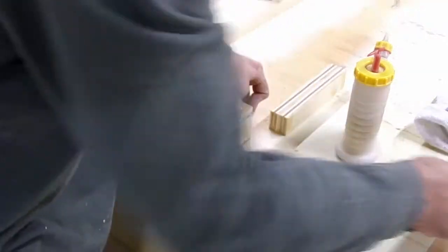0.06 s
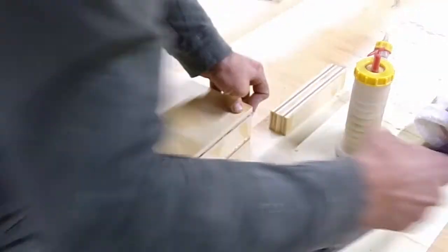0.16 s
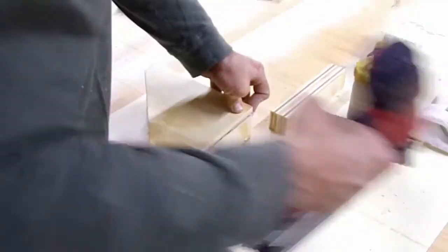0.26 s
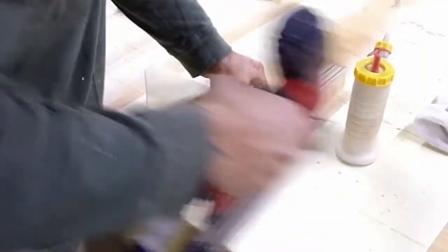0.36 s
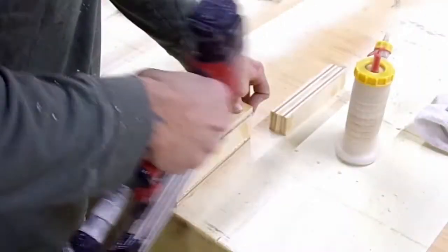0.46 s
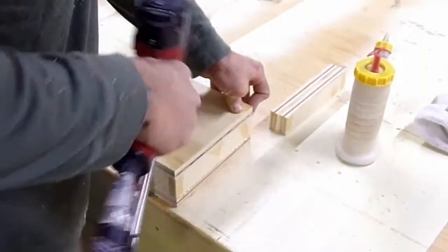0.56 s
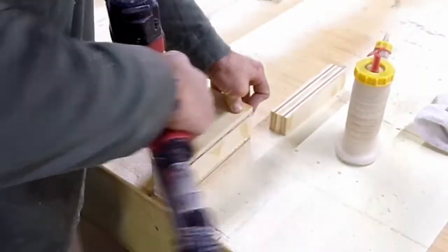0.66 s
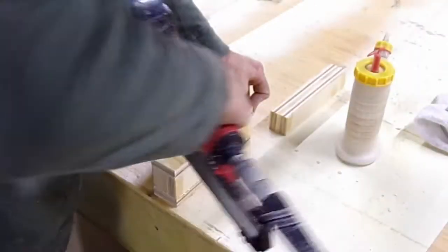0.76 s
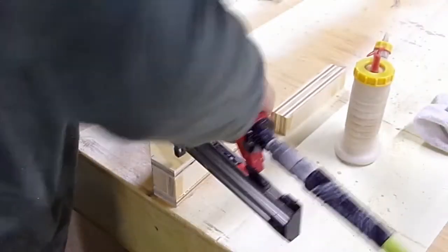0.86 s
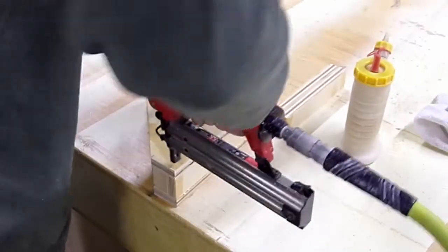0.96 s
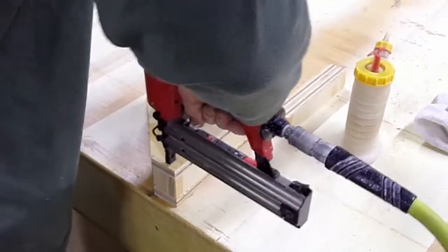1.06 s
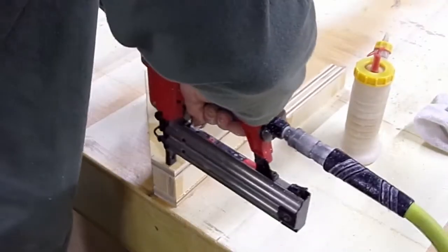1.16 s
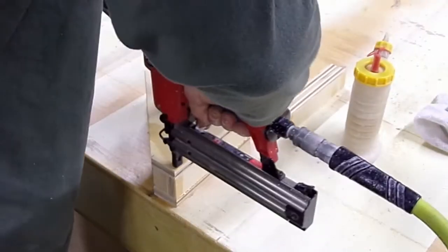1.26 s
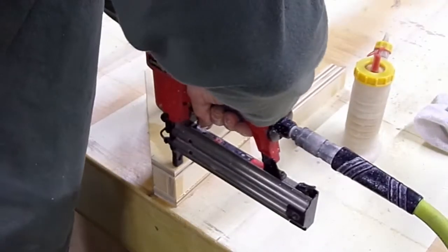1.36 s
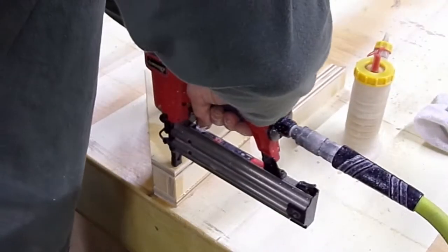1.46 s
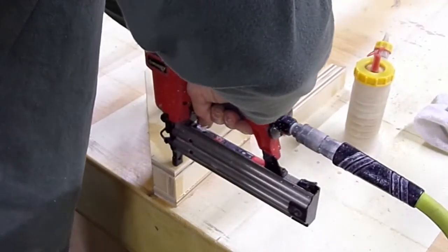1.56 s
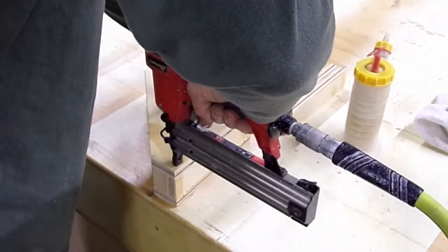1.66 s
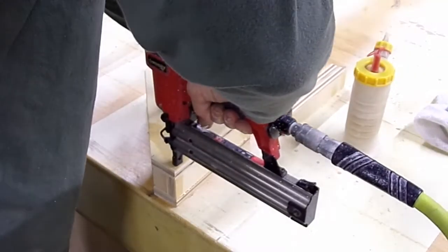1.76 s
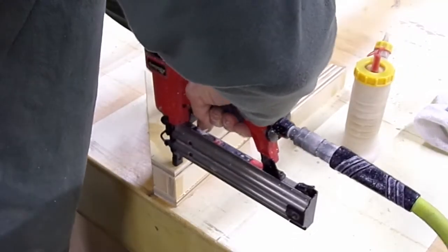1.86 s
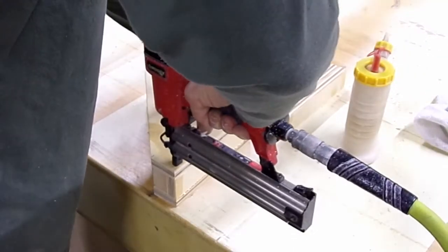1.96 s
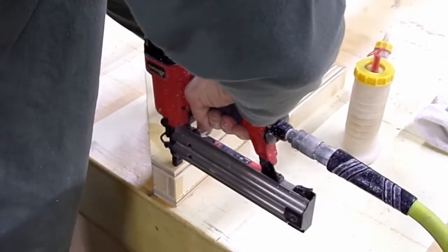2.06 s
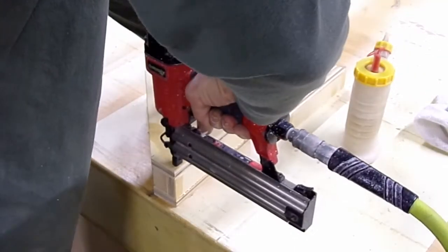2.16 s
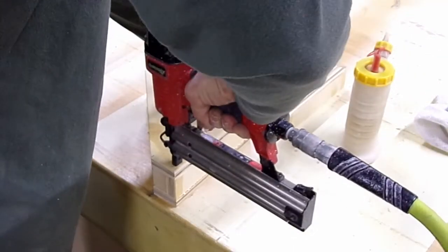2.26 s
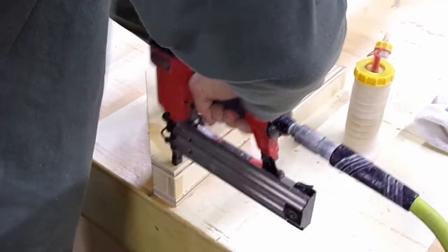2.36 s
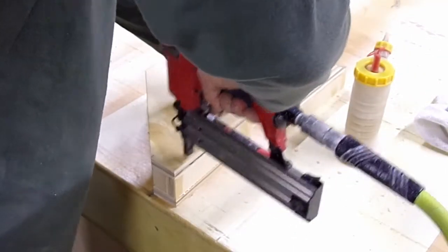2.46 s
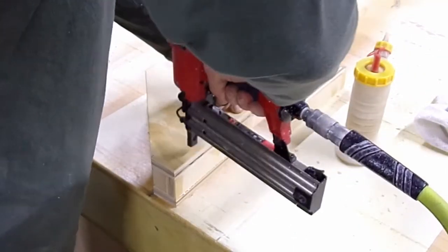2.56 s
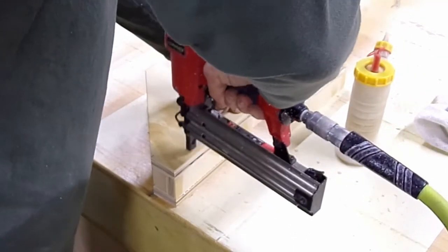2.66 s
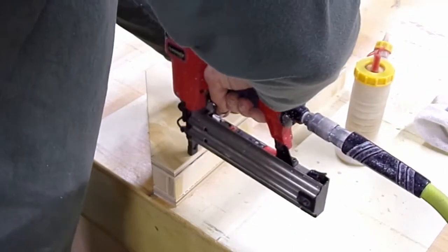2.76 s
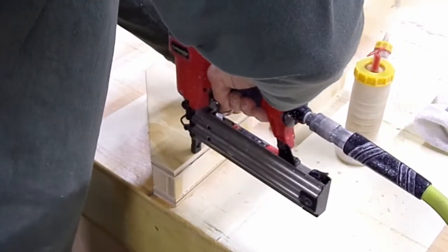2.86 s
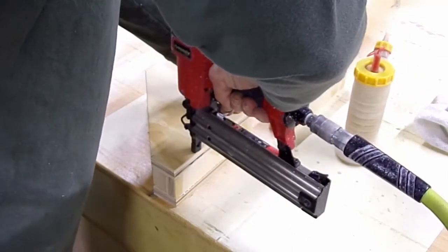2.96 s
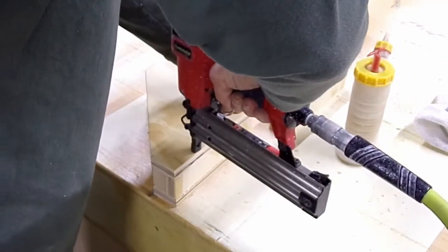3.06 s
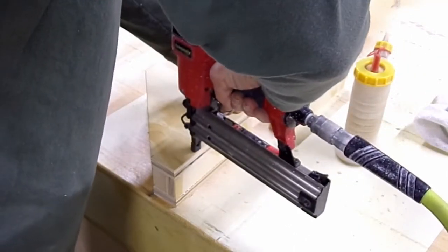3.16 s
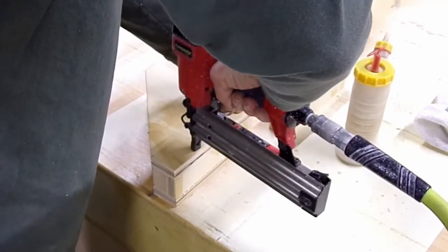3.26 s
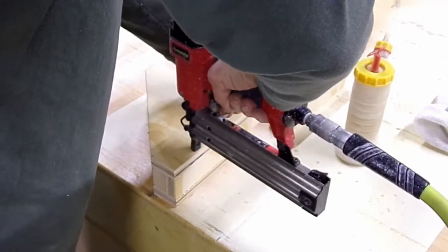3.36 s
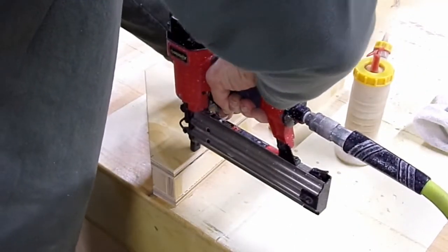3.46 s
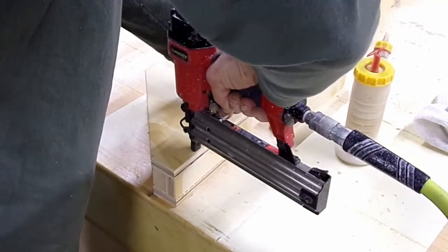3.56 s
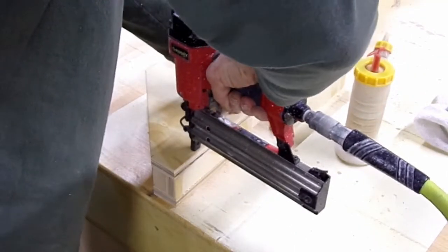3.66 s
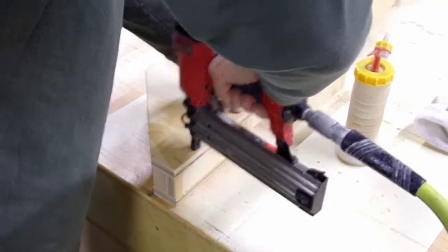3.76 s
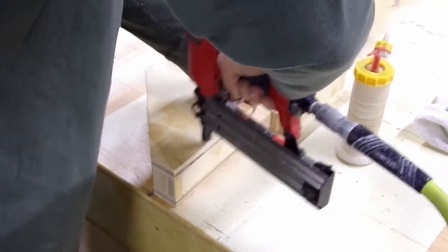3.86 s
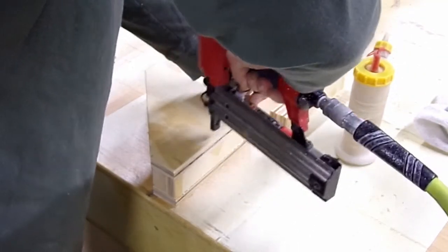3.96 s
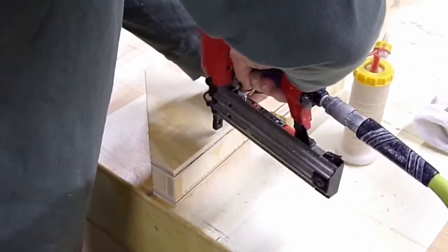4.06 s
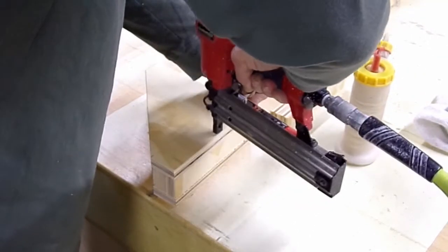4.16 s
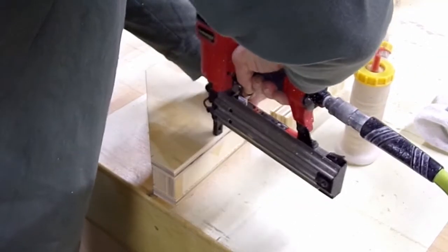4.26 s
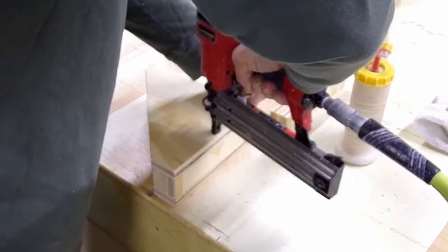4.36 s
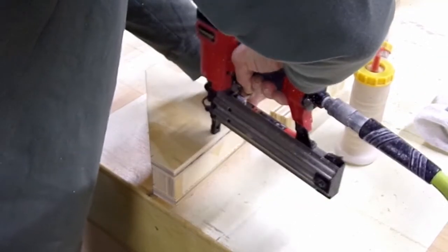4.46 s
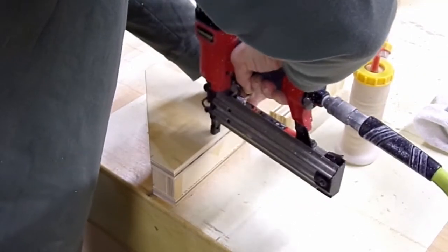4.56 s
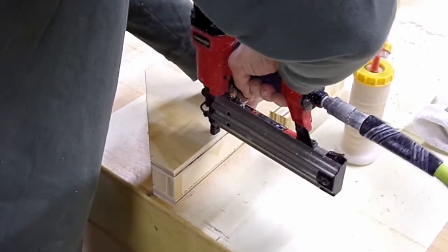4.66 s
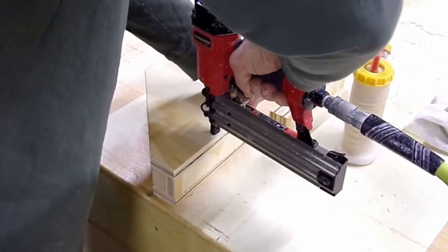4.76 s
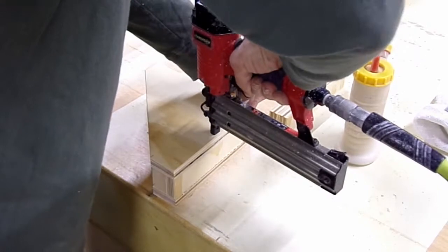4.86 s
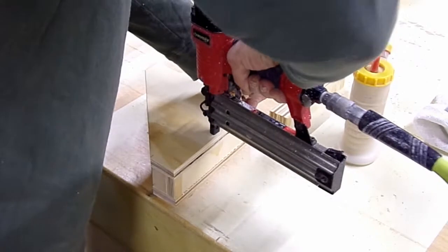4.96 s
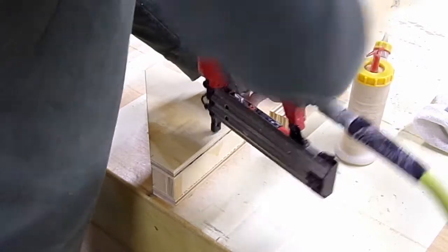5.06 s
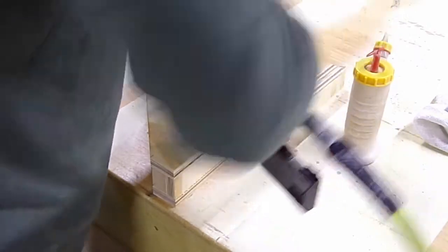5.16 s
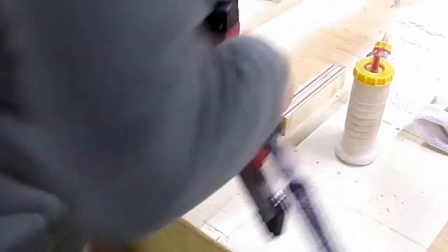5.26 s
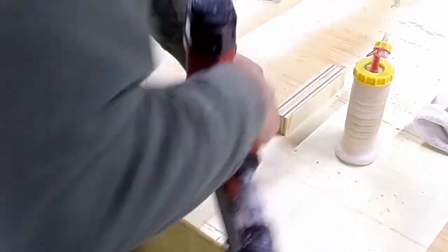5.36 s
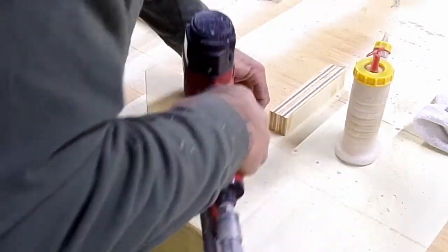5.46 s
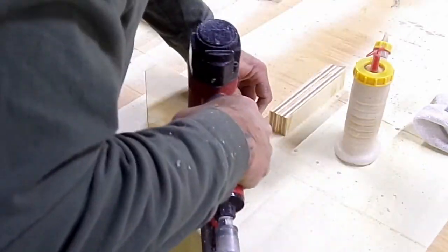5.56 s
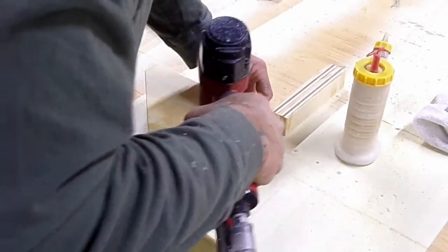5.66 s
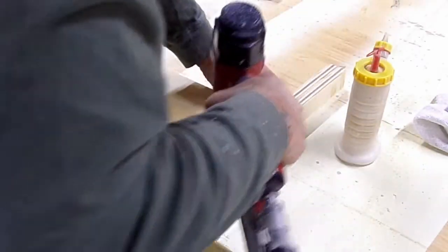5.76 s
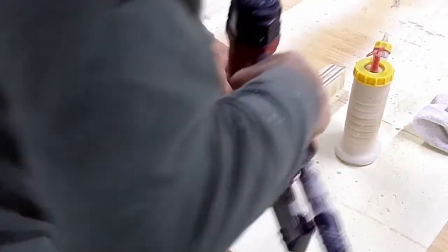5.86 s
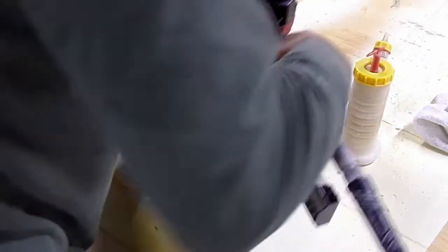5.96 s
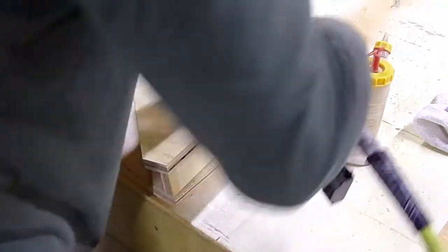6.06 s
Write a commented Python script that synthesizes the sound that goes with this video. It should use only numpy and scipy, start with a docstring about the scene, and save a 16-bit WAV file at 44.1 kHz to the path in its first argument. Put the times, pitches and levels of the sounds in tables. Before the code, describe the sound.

A low motor hum and dull fan rush run throughout in a workshop with a short, bright reverberation. At 0 s a tool scrapes softly off the bench; a faint rub of loose steel follows at 1.0, a touch on wood at 1.4 and a tick at 1.9. At 2.2 a pneumatic nailer fires: trigger click, spit of air, violent metallic crack with bench boom, then about 0.12 s later a sharp exhaust puff and a quick falling chirp. A thin refill hiss fades. At 2.7 the nose clicks and thuds on the wood, with small nudges at 3.2 and 3.4. The second shot comes at 3.6, a tick at 4.4, a firmer press at 4.6, the third shot at 4.9. A firm, clattering plywood knock lands at 5.8, a much lighter one at 6.0. The microphone is close, clipping on the shots and dipping the background afterwards.

```python
"""A pneumatic brad nailer fires three times into plywood, close to a small overloading microphone.
Over a workshop machine's hum and fan noise, the tool slides off the bench, ticks in the hand and is pressed on the wood.
Each shot is a trigger click, a spit of air, the driver's blow, an exhaust puff and the piston's falling chirp.
A faint hiss follows as air refills the tool; at the end the nose knocks down on the plywood, firmly, then lightly.
Noise bursts make air and friction, decaying modes make wood and steel, and decaying noise makes the room."""
import sys
import numpy as np
from scipy import signal
from scipy.fft import irfft
from scipy.io import wavfile
from scipy.ndimage import uniform_filter1d

SR = 44100
rng = np.random.default_rng(int(sys.argv[2]) if len(sys.argv) > 2 else 0)


def store_pcm(level_fs):
    """Save levels as 16-bit WAV."""
    pcm = np.round(np.clip(level_fs, -1, 1) * 32767).astype(np.int16)
    wavfile.write(sys.argv[1], SR, np.atleast_2d(pcm).T)


N = 269892
T = np.arange(SR // 2) / SR  # time axis of one short sound, in seconds


def amp(db):
    """Decibels to gain."""
    return 10 ** (np.asarray(db) / 20)


def read(points, hz):
    """A table's value on a log-frequency axis."""
    f, value = np.transpose(points)
    return np.interp(np.log(hz + 1), np.log(f), value)


def add(mix, s, sound):
    """Mixes a sound in at time s."""
    part = mix[max(round(s * SR), 0):][:len(sound)]
    part += sound[:len(part)]


def colour(x, points, tilt_db=0, size=4096):
    """Causal filter of unit energy with the given spectrum, tilted in dB per octave above 500 Hz."""
    hz = abs(np.fft.fftfreq(size, 1 / SR))
    octaves_up = np.log2(np.maximum(hz, 500) / 500)
    log_gain = np.log(amp(read(points, hz) + tilt_db * octaves_up))
    # the minimum-phase response starts without pre-echo
    taps = np.fft.ifft(np.exp(np.conj(signal.hilbert(log_gain)))).real
    return signal.fftconvolve(x, taps / np.linalg.norm(taps))[:len(x)]


def burst(rise, hold, t60):
    """Noise that swells for rise s, dies away from hold s on, and falls 60 dB every t60 s."""
    envelope = np.minimum(T / rise, 1) * amp(-60 * np.maximum(T - hold, 0) / t60)
    return envelope * rng.standard_normal(len(T))


def ring(modes, spread_db):
    """Struck modes: decaying sines, each a little different in strength and pitch from blow to blow."""
    out = np.zeros(len(T))
    for hz, db, t60 in modes:
        strength, detune = rng.standard_normal(2)
        cycles = hz * (1 + .005 * detune) * T + rng.random()
        envelope = amp(db + spread_db * strength - 60 * T / t60)
        out += envelope * np.sin(2 * np.pi * cycles)
    return out


# Decay of the workshop's reverberation. Each row: frequency in Hz, time to fall 60 dB in seconds.
ROOM_DECAY = [(120, 0.2135), (600, 0.1866), (1700, 0.2814), (4500, 0.3318), (9000, 0.29), (15000, 0.22)]
# Tone of the reverberation. Each row: frequency in Hz, relative level in dB.
ROOM_TONE = [(100, 6), (600, 4), (1500, 4.5), (4000, 5), (8000, 1), (14000, -5.5)]


def workshop(x, wet_db, build):
    """Dense reflections that build up over about build s, then die band by band."""
    hz, t, bands = signal.stft(rng.standard_normal(SR), SR, nperseg=256)
    bands = bands * amp(-60 * t / read(ROOM_DECAY, hz)[:, None])
    tail = signal.istft(bands, SR, nperseg=256)[1][:len(T)]
    tail = colour(tail * (1 - np.exp(-(T / build) ** 2)), ROOM_TONE)
    wet = signal.fftconvolve(x, tail / np.linalg.norm(tail))[:len(x)]
    return x + amp(wet_db) * wet


# Rush of the machine's fan. Each row: frequency in Hz, relative level in dB per Hz.
FAN_SPECTRUM = [(25, -32.5), (60, -14), (100, -5), (160, -1.5), (290, 1.5), (460, -10.5), (600, -2),
                (1200, -12), (2800, -12), (4500, -20), (7000, -31.5), (9000, -37), (11000, -46),
                (15500, -41.5)]
# Steady tones of the machine. Each row: frequency in Hz, level in dB rms.
MOTOR_TONES = [(120, -46.5), (280, -60.5), (360, -60), (420.5, -60.5), (705, -74), (857.5, -59),
               (1125, -68)]


def machine():
    """A running motor: slightly wavering tones over the rush of its fan."""
    t = np.arange(N) / SR
    out = amp(-47.5) * colour(rng.standard_normal(N), FAN_SPECTRUM)
    knots = np.linspace(0, t[-1], num=30)
    for hz, db in MOTOR_TONES:
        wander = np.interp(t, knots, rng.standard_normal(len(knots)))
        out += amp(db) * np.sqrt(2) * np.sin(2 * np.pi * hz * (t + .00008 * wander))
    return out


# Singing resonances of the hose coupling. Each row: frequency in Hz, width in Hz, level in dB rms before fading.
COUPLING_RESONANCES = [(4930, 250, -62), (9640, 110, -70), (12980, 260, -74)]
REFILL_T60_S = 2.6


def refill():
    """Air streams back after each shot: a faint hiss in narrow resonances, fading as the pressure evens out."""
    t, flow, out = np.arange(N) / SR, np.zeros(N), np.zeros(N)
    for s, _, _, vent_after in SHOT_TIMES:
        add(flow, s + vent_after, amp(-60 * t / REFILL_T60_S))
    for hz, width, db in COUPLING_RESONANCES:
        hiss = signal.lfilter(*signal.iirpeak(hz, hz / width, SR), rng.standard_normal(N))
        out += amp(db) * hiss / hiss.std()
    return flow * out


# Spectrum of small steel contacts. Each row: frequency in Hz, relative level in dB per Hz.
CLICK_SPECTRUM = [(200, -16.5), (1000, -7.5), (2400, 11), (4000, 2.5), (6200, -6.5), (8600, -8),
                  (10500, -25.5), (15000, -27.5)]
# Small spring in the nose. Each row: frequency in Hz, relative level in dB, time to fall 60 dB in seconds.
SPRING_MODES = [(1476, -1.5, 0.08), (2090, 1, 0.032), (3100, -2.5, 0.045), (8400, -10, .15)]


def click(tilt_db, length, spring_db, t60=.018):
    """Small steel parts scrape and click in noise of uneven grain, and the spring in the nose rings."""
    roughness = uniform_filter1d(rng.standard_normal(len(T)), size=49) * np.sqrt(49)
    grains = amp(3 * roughness)
    rub = burst(rise=0.00077, hold=length, t60=t60)
    scrape = colour(grains * rub, CLICK_SPECTRUM, tilt_db=tilt_db)
    return scrape + amp(spring_db) * ring(SPRING_MODES, spread_db=3.0)


# Dull answer of the wood. Each row: frequency in Hz, relative level in dB per Hz.
THUD_SPECTRUM = [(30, -43), (60, -26), (85, -8.5), (120, 0.5), (200, 0.5), (300, -0.5), (480, -7),
                 (850, -7), (1300, -16), (3000, -23), (8000, -57.5), (15000, -85)]


def thud():
    """The wood under the tip answers a contact with a low, soft burst."""
    return colour(burst(rise=0.0041, hold=0.0078, t60=0.12), THUD_SPECTRUM)


# A light touch is bright (tilt in dB per octave); a firmer one digs in and dulls (tilt lost per dB above LIGHT_DB).
LIGHT_DB, LIGHT_TILT_DB, DULLING = -41, 3.3, .45


def press(db, seats_after, seat_db, wood_db, spring_db):
    """The safety tip touches the wood, drags on it while it slides in, then seats against its spring."""
    tilt_db = LIGHT_TILT_DB - DULLING * (db - LIGHT_DB)
    out = amp(db) * click(tilt_db, length=.004, spring_db=-17, t60=.022)
    drag = click(tilt_db=1, length=seats_after, spring_db=-20)
    out += amp(wood_db) * (thud() + amp(-12) * drag)
    seat = click(tilt_db=0.5, length=.004, spring_db=spring_db - seat_db, t60=.06)
    add(out, seats_after, amp(seat_db) * seat)
    add(out, seats_after, amp(wood_db - 7.5) * thud())
    return out


# The tool slides off the bench. Its one row: start in seconds, level in dB, hold of the scrape in seconds.
BENCH_SLIDE = (.002, -41, .016)
# Loose steel parts tick as the grip shifts. Each row: start in seconds, level in dB, hold of the scrape in seconds.
GRIP_TICKS = [(1.042, -52.5, 0.034), (1.872, -39.5, .0014), (4.430, -40, 0.00333)]
# The nose nudges the workpiece. Each row: start in seconds, level of the click in dB, level of the wood in dB.
NOSE_NUDGES = [(2.705, -48, -45), (3.229, -50, -42.5), (3.3736, -38, -39.5)]
# The safety tip is pressed on the wood, then seats. Each row: start in seconds, level of the touch in dB,
# seconds until it seats, level of the seating in dB, level of the wood in dB, level of the seated spring in dB.
TIP_PRESSES = [(1.4417, -41, .021, -42.5, -54, -42), (2.716, -41.5, 0.027, -40.5, -37, -56),
               (4.606, -30, .031, -44, -33, -62)]
TRIGGER_DB = -44


def handling():
    """The tool is picked up, shifted, pressed on the work and triggered: steel clicks and soft wood thuds."""
    out = np.zeros(N)
    s, db, length = BENCH_SLIDE
    slide = click(tilt_db=-2.5, length=length, spring_db=-24, t60=0.24)
    add(out, s, amp(db) * (slide + amp(-0.5) * thud()))
    for s, db, length in GRIP_TICKS:
        tick = click(tilt_db=2.0, length=length, spring_db=-14, t60=.024)
        add(out, s, amp(db) * (tick + amp(-12.5) * thud()))
    for s, db, wood_db in NOSE_NUDGES:
        nudge = click(tilt_db=-2, length=.002, spring_db=-21)
        add(out, s, amp(db) * nudge + amp(wood_db) * thud())
    for s, *row in TIP_PRESSES:
        add(out, s, press(*row))
    for s, _, trigger_lead, _ in SHOT_TIMES:
        trigger = click(tilt_db=5.5, length=0.0017, spring_db=-23.5)
        add(out, s - trigger_lead, amp(TRIGGER_DB) * trigger)
    return out


def bending_wave(centre_hz, octaves, delay):
    """A tap carried by the board: high notes run ahead, with the given delay in s at 1 kHz."""
    hz = np.fft.rfftfreq(len(T), 1 / SR) + 1
    contact = 1 / (1 + (np.log2(hz / centre_hz) / octaves) ** 2 / 2) ** 2
    contact /= 1 + (hz / (2.14 * centre_hz)) ** 6  # wood is too soft to carry the top treble
    # this phase makes the delay shrink with the square root of frequency
    wave = irfft(contact * np.exp(-4j * np.pi * delay * np.sqrt(1000 * hz)), len(T))
    return wave / abs(wave).max()


# The nose is set down on the plywood. Each row: start in seconds, relative level of the tap in dB, centre of the
# contact spectrum in Hz, its width in octaves, relative level of the ring in dB, relative level of the bench's thud in dB.
NOSE_KNOCKS = [(5.8375, -7, 2610, 0.64, -22, -16.5), (5.9756, -22, 1480, 1, -21.5, -32.5)]
# Rattle of the magazine. Each row: frequency in Hz, relative level in dB per Hz.
CLATTER_SPECTRUM = [(40, -40), (400, -24), (1400, -0.5), (2800, 8.5), (4000, -2), (5200, -15), (8000, -32),
                    (15000, -69)]
# The glued plywood piece. Each row: frequency in Hz, relative level in dB, time to fall 60 dB in seconds.
PLYWOOD_MODES = [(306, -13.5, 0.27), (585, -7.5, 0.14), (798, -4, 0.14), (861, 7.5, 0.053), (983, 1, 0.066),
                 (1088, 3.5, 0.049), (1380, 6.5, 0.026), (1646, -2, 0.056)]


def knocks():
    """The nose lands on the plywood and bounces; the magazine clatters, the piece rings, the bench thuds."""
    out = np.zeros(N)
    for s, db, centre_hz, octaves, ring_db, thud_db in NOSE_KNOCKS:
        tap = amp(db + 6.0) * bending_wave(centre_hz, octaves, delay=.006)
        add(out, s, tap)
        add(out, s + .0112, amp(db + 5.0) * tap)  # a harder landing bounces more
        weight = bending_wave(centre_hz=417, octaves=1.0, delay=0.00397)  # the tool's weight follows
        add(out, s, amp(thud_db) * weight)
        clatter = colour(burst(rise=0.0013, hold=0.0091, t60=0.077), CLATTER_SPECTRUM)
        add(out, s + 0.004, amp(db - 9) * clatter)
        piece = ring(PLYWOOD_MODES, spread_db=4.0) * (1 - np.exp(-(T / 0.0023) ** 2))
        add(out, s + 0.00384, amp(ring_db) * piece)
        bench = colour(burst(rise=0.0027, hold=0.025, t60=0.14), THUD_SPECTRUM)
        add(out, s + .008, amp(thud_db) * bench)
    return out


# Bench and workpiece. Each row: frequency in Hz, relative level in dB, time to fall 60 dB in seconds.
BENCH_MODES = [(121, -13, 0.15), (194, -11, 0.14), (239.6, 0, .22), (369.6, -3, .17), (387, -11, 0.14),
               (433, -7, 0.12), (474, -11.5, 0.27), (606.6, -4.5, 0.23), (805, -9.5, 0.18)]


def boom():
    """Recoil pushes the bench; its heavy top takes a few cycles to swing, then booms."""
    u = T / 0.0013
    push = (1 - u) * np.exp(-u)
    swing = ring(BENCH_MODES, spread_db=1.5) * (1 - np.exp(-T / 0.0073))
    return amp(-18.0) * push + amp(-10) * swing


def chirp(start_hz, end_hz, glide, length):
    """The last air squeezed out by the returning piston: a few cycles that fall in pitch."""
    hz = end_hz + (start_hz - end_hz) * np.exp(-T / glide)
    swell = np.sin(np.pi * np.minimum(T / length, 1))
    return swell * np.sin(2 * np.pi * np.cumsum(hz) / SR)


def piston_home():
    """A tick and a falling chirp as the piston seats; the bench top reflects the chirp at once."""
    out = amp(1.5) * colour(burst(rise=.0003, hold=0.0021, t60=0.017), CLICK_SPECTRUM)
    squeak = chirp(start_hz=2680, end_hz=856, glide=0.00161, length=0.0044)
    add(out, .0004, amp(7.5) * squeak)
    add(out, .0015, amp(-4) * squeak)  # reflection
    return out


# Driver striking the brad and its stop. Each row: frequency in Hz, relative level in dB per Hz.
BLOW_SPECTRUM = [(30, -15.5), (100, -6), (300, -0.5), (700, -6), (1300, 1), (2600, -0.5), (4000, -1),
                 (6500, -8.5), (9000, -10), (11000, -22.5), (15500, -20)]
# The nailer's housing and magazine. Each row: frequency in Hz, relative level in dB, time to fall 60 dB in seconds.
HOUSING_MODES = [(992, -6, .15), (1308, -9, 0.18), (1504, -7.5, .18), (1560, -5, 0.21), (1692, -7, 0.47),
                 (2234, -4.5, 0.26), (2450, -1.5, 0.27), (2515, -0.5, 0.33), (2900, -4.5, .15),
                 (3310, -4, .17), (3600, -7.5, .2), (3940, -10, .2), (8830, -11.5, 0.27)]


def blow():
    """The driver sinks the brad and hits its stop: a dense rattle, a crack, then the housing rings on."""
    rattle = colour(burst(rise=0.00086, hold=.011, t60=0.097), BLOW_SPECTRUM)
    crack = colour(burst(rise=0.00043, hold=0.001, t60=0.011), BLOW_SPECTRUM, tilt_db=4.0)
    out = amp(-1.5) * rattle
    add(out, .003, amp(-0.5) * crack)
    return out + amp(-19.0) * ring(HOUSING_MODES, spread_db=1.5)


# Air spitting from the opening valve. Each row: frequency in Hz, relative level in dB per Hz.
SPIT_SPECTRUM = [(60, -10.5), (400, -1), (1500, -11.5), (2500, -4.5), (3600, 9), (5000, -3), (7000, 1.5),
                 (9000, 0.5), (10500, -20.5), (13500, -3), (16000, -2)]
# Air venting from the cylinder. Each row: frequency in Hz, relative level in dB per Hz.
EXHAUST_SPECTRUM = [(40, -14.5), (300, -5.5), (800, -9.5), (1500, -7.5), (2700, -1), (4500, -1.5),
                    (7000, 2), (9000, 1), (10800, -10.5), (13500, -2.5), (16000, -7)]


def shot(blow_db, vent_after, vent_db, lead):
    """The valve opens with a spit, the driver strikes after lead s, the valve resets and the cylinder vents."""
    out = np.zeros(SR)
    spit = colour(burst(rise=.003, hold=.009, t60=.04), SPIT_SPECTRUM)
    add(out, 0, amp(-13.5) * spit)
    add(out, lead, amp(blow_db) * blow())
    first_puff = colour(burst(rise=0.0021, hold=0.0022, t60=0.028), EXHAUST_SPECTRUM, tilt_db=-3)
    add(out, lead + vent_after - .012, amp(-17.5) * first_puff)
    vent = colour(burst(rise=0.0061, hold=0.015, t60=0.13), EXHAUST_SPECTRUM)
    add(out, lead + vent_after, amp(vent_db) * vent)
    return out


# The three shots. Each row: start of the blow in seconds, level of the blow in dB,
# seconds by which the trigger comes before the blow, seconds from the blow until the valve resets.
SHOT_TIMES = [(2.2076, 7.5, .0316, .1179), (3.6192, 8, .0272, .1168), (4.8714, 7.5, .0254, .1158)]
# Every shot: the valve opens this long before the blow, and the piston comes home this long after the reset.
VALVE_LEAD_S, RETURN_S = .0142, .0331
VENT_DB, RECOIL_DB = 2, -1  # recoil is relative to the blow


def nailer():
    """Three shots; tool and arm shift between them, so the room answers each a little differently."""
    out = np.zeros(N)
    for s, blow_db, _, vent_after in SHOT_TIMES:
        firing = shot(blow_db, vent_after, VENT_DB, VALVE_LEAD_S)
        add(out, s - VALVE_LEAD_S, workshop(firing, wet_db=-10, build=.008))
        recoil = amp(blow_db + RECOIL_DB) * boom()
        add(out, s, workshop(recoil, wet_db=-12.5, build=0.012))
        add(out, s + vent_after + RETURN_S, workshop(piston_home(), wet_db=-14.5, build=0.0067))
    return out


def scene():
    """The machine and the refill hiss, with tool and bench sounding in the room."""
    out = machine() + refill()
    out += workshop(handling(), wet_db=-10.0, build=.008)
    out += workshop(knocks(), wet_db=-12.5, build=0.0063)
    out += nailer()
    return out[None]


def gain_control(x, threshold_db, most_db, recover_db, attack):
    """Turns loud sound down, too late for the attack, and recovers by recover_db a second."""
    power_db = 10 * np.log10(signal.lfilter([.01], [1, -.99], x ** 2) + 1e-12)
    fall = np.arange(N) * recover_db / SR
    excess_db = np.clip(power_db - threshold_db, 0, most_db)
    cut_db = np.maximum.accumulate(excess_db + fall) - fall  # peaks held, then released in a straight line
    keep = np.exp(-1 / (attack * SR))
    return x * amp(-signal.lfilter([1 - keep], [1, -keep], cut_db))


# Narrow dips in the microphone's response. Each row: frequency in Hz, width in Hz.
MICROPHONE_DIPS = [(3680, 160), (4400, 300), (8030, 420), (11730, 400)]
EDGE_HZ = 15850  # upper band limit


def record(dry):
    """Microphone dips, gain control, hard overload and the band limit."""
    x = dry[0]
    for hz, width in MICROPHONE_DIPS:
        x = signal.lfilter(*signal.iirnotch(hz, hz / width, SR), x)
    x = gain_control(x, threshold_db=-12.5, most_db=7, recover_db=54, attack=.012)
    x = np.clip(x, -1, 1)
    low_pass = signal.firwin(511, EDGE_HZ, window=("kaiser", 8), fs=SR)
    return signal.oaconvolve(x, low_pass, "same")[None]


dry = scene()
out = record(dry)
store_pcm(out)
```